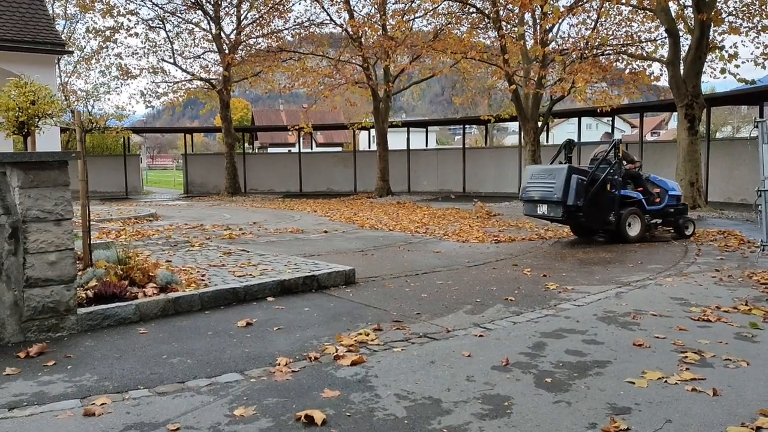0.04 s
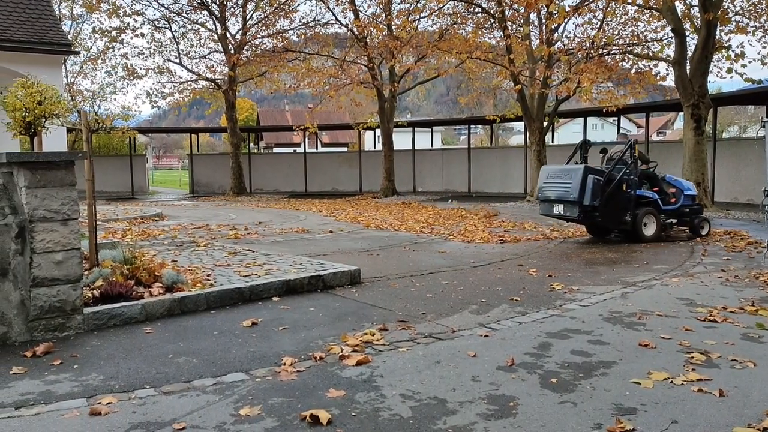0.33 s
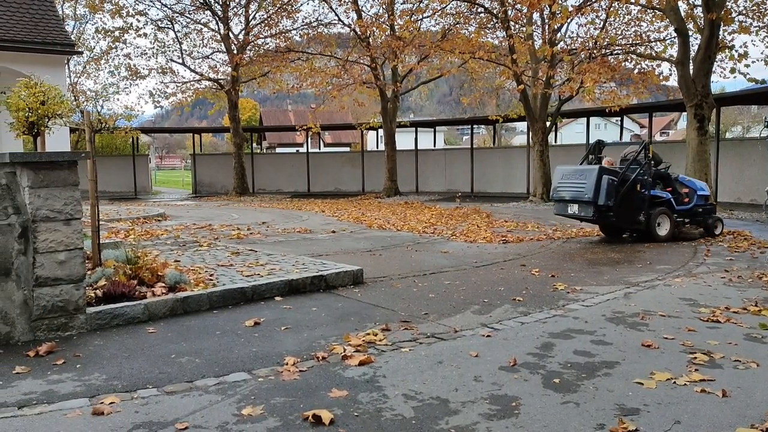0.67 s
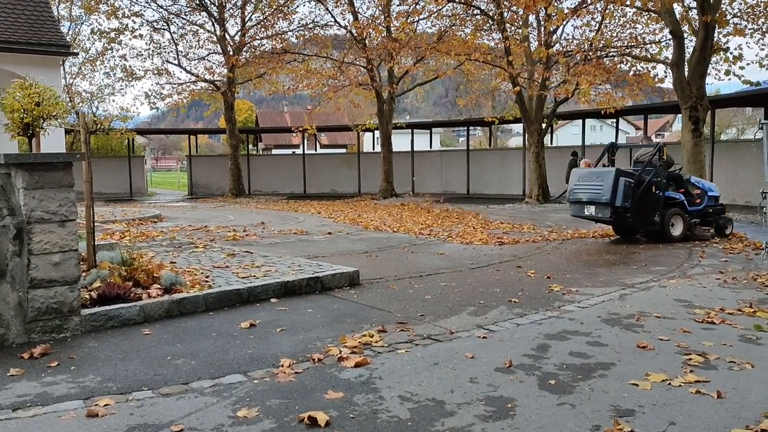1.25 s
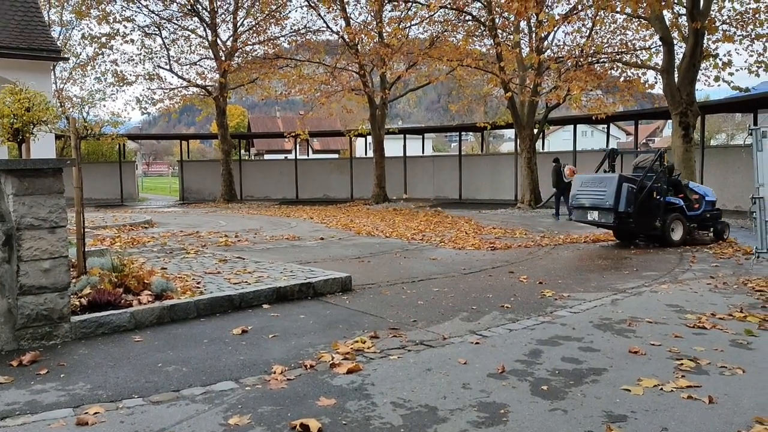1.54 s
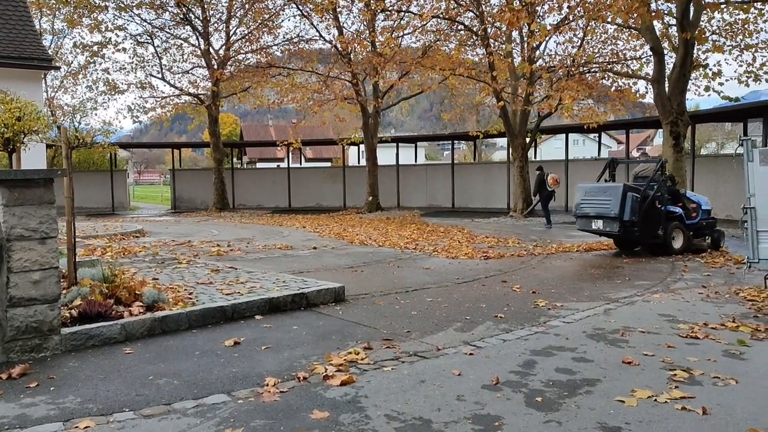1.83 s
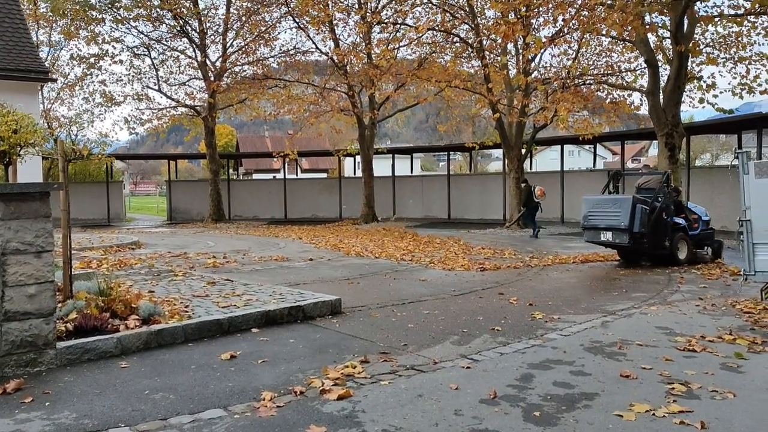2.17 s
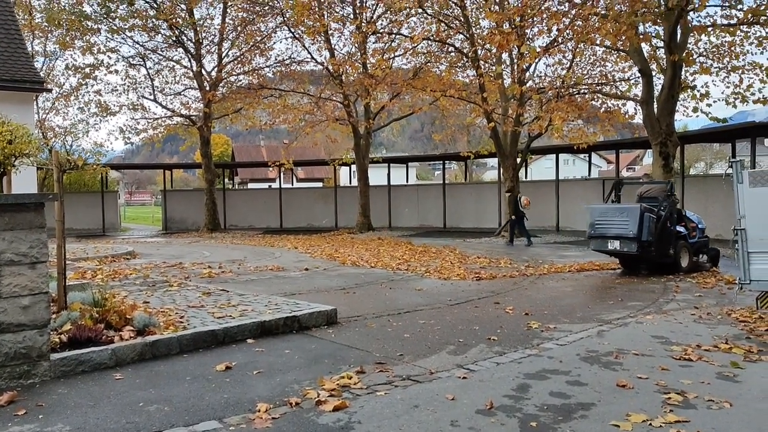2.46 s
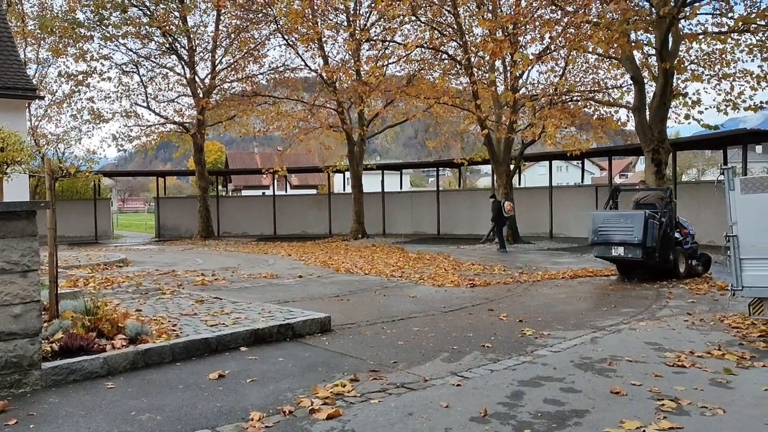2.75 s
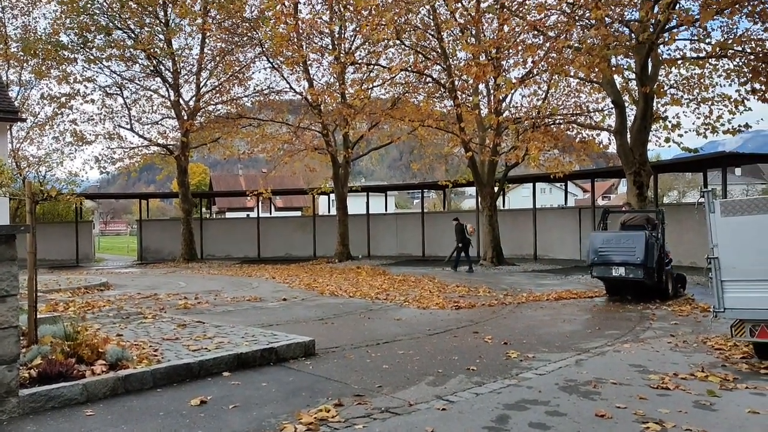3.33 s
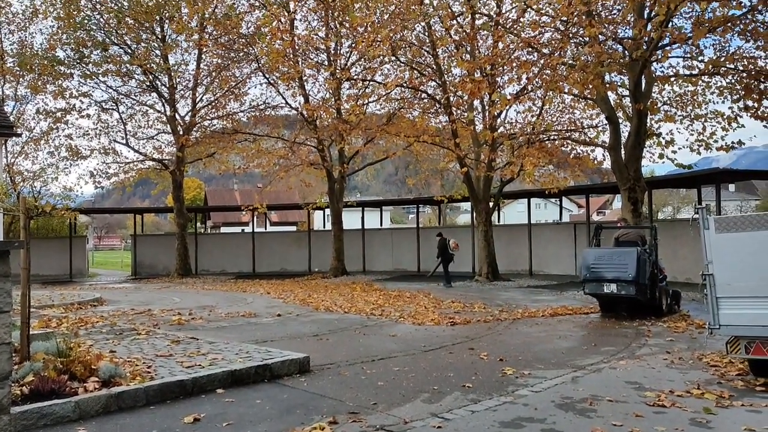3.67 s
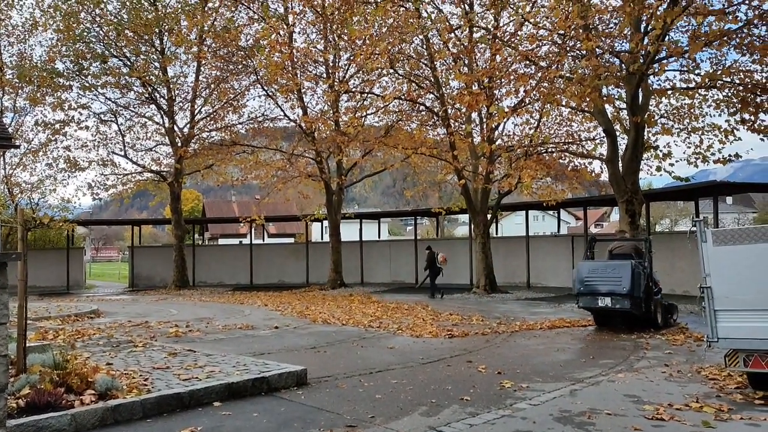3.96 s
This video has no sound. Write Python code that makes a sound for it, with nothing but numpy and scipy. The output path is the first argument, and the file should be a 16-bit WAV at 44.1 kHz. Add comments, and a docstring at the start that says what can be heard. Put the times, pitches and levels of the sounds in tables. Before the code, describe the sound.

A ride-on leaf collector drones across a paved yard, its suction fan roaring as dry leaves hiss and click up the duct. Farther off a leaf blower swells and fades, and a fast ticking enters near the end.

```python
"""A ride-on leaf collector drives across a paved yard, its engine held at steady revs. From the start
the engine drones, the suction fan roars and dry leaves hiss up the duct, while a leaf blower revs up
and down farther off. After about a second the collector begins to turn its back to the listener.
Midway, air whistles in the duct as more clumps of leaves strike it. Near the end a fast ticking,
probably a small idling engine, comes in from the right."""
import sys
import numpy as np
from scipy import signal
from scipy.fft import rfft, irfft, next_fast_len
from scipy.io import wavfile
from scipy.ndimage import map_coordinates

SR = 44100
rng = np.random.default_rng(int(sys.argv[2]) if len(sys.argv) > 2 else 0)


def dump_mix(stems):
    """Bounce the given channels to the path in sys.argv[1] as a 16-bit WAV at rate SR."""
    frames = np.atleast_2d(stems).T  # one column per channel
    limited = np.clip(frames, -1, 1)  # hard clip at full scale
    pcm = np.round(limited * 32767).astype(np.int16)
    wavfile.write(sys.argv[1], SR, pcm)


N = 176400
TIME = np.arange(N) / SR
SIDES = np.array([[.5], [-.5]])  # splits a difference: half added on the left, half taken off the right


def amp(db):
    """Turn decibels into a factor to multiply by."""
    return 10 ** (np.asarray(db) / 20)


def unit(x):
    """Scale a sound to an average strength (rms) of 1."""
    return x / np.sqrt(np.mean(x ** 2) + 1e-20)


def along(points, hz):
    """Read between a table's rows at any frequency, on a log scale."""
    freqs, values = np.transpose(points)
    return np.interp(np.log(hz + 1), np.log(freqs + 1), values)


def curves(rows):
    """Join a table's rows with straight lines: one curve for each column after the time."""
    times, *columns = np.transpose(rows)
    return [np.interp(TIME, times, column) for column in columns]


def wobble(rate):
    """A smooth curve through `rate` random values a second."""
    coarse = np.arange(0, N + 64, 64)
    smooth = map_coordinates(rng.standard_normal(size=1024), [coarse * rate / SR], mode="wrap")
    return np.interp(np.arange(N), coarse, smooth)


def noise():
    """Two unrelated channels of white noise."""
    return rng.standard_normal((2, N))


def filtered(x, response):
    """Multiply each frequency in x by response(hz)."""
    size = next_fast_len(N + SR // 4)
    return irfft(rfft(x, size) * response(np.fft.rfftfreq(size, 1 / SR)), size)[..., :N]


def angle(hz):
    """How far a shaft has turned, in radians, given its turns a second."""
    return 2 * np.pi * np.cumsum(hz) / SR


# How alike the two ears' sounds are. Each row: frequency in Hz, likeness from 0 to 1.
EAR_LIKENESS = [(100, 0.47), (300, 0.94), (420, 0.37), (600, 0.073), (900, 0.1), (2000, 0.12), (7000, 0.19),
                (15000, 0.11)]

def spread(pair, colour, lead_s=.00016):
    """Make two unrelated signals one coloured stereo sound that reaches the left ear lead_s earlier."""
    def shape(hz):
        blend = np.arccos(np.clip(along(EAR_LIKENESS, hz), -1, 1)) / 2
        return amp(along(colour, hz)) * [np.cos(blend), np.sin(blend)]
    mid, side = filtered(pair, shape)
    ears = np.array([mid + side, mid - side])
    return unit(filtered(ears, lambda hz: np.exp(2j * np.pi * hz * lead_s * SIDES)))


def harmonic(shaft, multiple, scatter, rate, apart):
    """One tone at a multiple of a shaft's speed, plus shifting echoes from the yard."""
    def drift():
        return wobble(rate) + 1j * wobble(rate)
    direct = np.exp(1j * apart * SIDES)  # apart: phase between the ears, in radians
    echoes = scatter * (drift() + .5 * np.array([drift(), drift()]))
    phase = multiple * shaft + rng.uniform(0, 2 * np.pi) + 0.71 * wobble(1.61)
    return unit(np.real((direct + echoes) * np.exp(1j * phase)))


# The blower's revs. Each row: time in seconds, turns a second, relative level in dB.
BLOWER_REVS = [(0, 139.5, -31.5), (.7, 137.6, -26), (.92, 139, -31), (1.05, 141.2, -24.5), (1.3, 138, -43),
               (1.7, 130.3, -55), (2, 139, -29), (2.25, 145.5, -35), (2.5, 138, -53), (3.4, 137.4, -35),
               (3.7, 153, -34), (4, 155, -31)]
# Its tones. Each row: multiple of the shaft speed, dB added to that level.
BLOWER_TONES = [(4, -1.5), (5, -13)]

def blower():
    """The distant leaf blower's note follows its throttle."""
    hz, db = curves(BLOWER_REVS)
    shaft = angle(hz * (1 + 0.0019 * wobble(12)))
    return amp(db) * sum(amp(level) * harmonic(shaft, round(k), scatter=0.8, rate=14, apart=.5 * k)
                         for k, level in BLOWER_TONES)


# The ticking's pace. Each row: time in seconds, ticks a second, relative level in dB.
TICK_PACE = [(3.1, 45, -54), (3.35, 56, -39), (3.5, 51, -41), (3.62, 50, -34.5), (3.78, 51.5, -34.5),
             (4, 49, -36.5)]
# Its bright colour. Each row: frequency in Hz, relative level in dB.
TICK_COLOUR = [(1500, -60), (3000, -16), (5200, -19), (6800, 5.5), (8300, 6), (9500, 1.5), (12500, -7),
               (15400, -1)]

def ticking():
    """One bright puff per turn, probably of a small engine, quickening a little on the right."""
    rate, db = curves(TICK_PACE)
    age_s = (np.cumsum(rate) / SR % 1) / rate
    puffs = np.exp(-age_s / 0.0083) * amp(1.4 * wobble(65))
    ticks = spread(puffs * noise(), TICK_COLOUR, lead_s=-0.000533)
    return amp(db - 4 * SIDES) * ticks


# Hits on the duct. Each row: start in seconds, relative level in dB, fading time in seconds.
CLUMP_HITS = [(.535, -21.5, 0.015), (.556, -30, 0.03), (1.055, -29, .016), (1.632, -23, 0.0082),
              (1.789, -22, .007), (2.081, -23, .006), (2.142, -20, .006), (3.094, -29.5, .018),
              (3.204, -23, 0.0055)]
# Their colour. Each row: frequency in Hz, relative level in dB.
CLUMP_COLOUR = [(1000, -40), (3500, -1), (7100, 4), (9500, 3), (15400, -9)]

def clumps():
    """Thick clumps of leaves hit the duct with a short bright scrape, twigs with a tick."""
    level = np.zeros(N)
    for start, db, fade_s in CLUMP_HITS:
        age_s = np.maximum(TIME - start, 0)
        rise = 1 - np.exp(-age_s / 0.00099)
        level += amp(db) * rise * np.exp(-age_s / fade_s)
    return level * spread(noise(), CLUMP_COLOUR)


def crackle(per_second=340, fade_s=0.0019):
    """Leaves crackle in brief random bursts, a few much larger than the rest."""
    hits = rng.random(N) < per_second / SR
    sizes = amp(2.6 * np.minimum(rng.exponential(size=N), 4))
    bursts = signal.lfilter([1], [1, -np.exp(-1 / (fade_s * SR))], hits * sizes)
    return unit(bursts * noise())


# The flow of leaves up the duct. Each row: time in seconds, relative level in dB.
LEAF_FLOW = [(0, -34.5), (.5, -33.5), (.64, -32), (.82, -34.5), (1.1, -30), (1.56, -34.5), (1.64, -32),
             (1.8, -31), (2.03, -31.5), (2.2, -30.5), (2.44, -35.5), (2.78, -33.5), (2.93, -40),
             (3.05, -32.5), (3.42, -38), (4, -38)]
# The colour of the duct's hiss. Each row: frequency in Hz, relative level in dB.
HISS_COLOUR = [(800, -36), (2000, -5.5), (3800, 1), (5200, -6), (6100, -0.5), (7100, 3.5), (8400, -1),
               (10000, -4.5), (13000, -11), (15400, -10)]

def leaves(split_hz=8000):
    """Dry leaves hiss up the duct; large ones crackle low, small ones high."""
    def low_share(hz):
        return 1 / (1 + (hz / split_hz) ** 6)
    large = filtered(crackle(), lambda hz: np.sqrt(low_share(hz)))
    small = filtered(crackle(), lambda hz: np.sqrt(1 - low_share(hz)))
    rustle = spread(noise() + amp(-8) * (large + small), HISS_COLOUR)
    flicker_db = 0.4 * wobble(25.05) + 1.02 * wobble(140)
    return amp(curves(LEAF_FLOW)[0] + 3.5 + flicker_db) * rustle


# The whistle swells and fades. Each row: time in seconds, relative level in dB.
WHISTLE_SWELL = [(1.5, -56), (1.8, -48), (2.15, -36.5), (2.55, -42), (2.8, -53)]

def whistle(pitch_hz=7360, half_width_hz=140):
    """Rushing air makes the duct ring at one high pitch."""
    ring = filtered(noise(), lambda hz: 1 / (1 + ((hz - pitch_hz) / half_width_hz) ** 2))
    return amp(curves(WHISTLE_SWELL)[0]) * spread(ring, HISS_COLOUR)


# The fan's hum, which beats with the engine. Each row: multiple of the fan speed, relative level in dB.
FAN_TONES = [(6, -32), (7, -40.5), (8, -34.5)]
# How loud the low roar and the higher rasp are. Each row: time in seconds, relative level in dB.
ROAR_LEVEL = [(0, -23), (.5, -21.5), (1.05, -20.5), (1.4, -25), (2.15, -22), (2.5, -25.5), (2.64, -20.5),
              (2.75, -25), (3, -24.5), (3.25, -23.5), (4, -24)]
RASP_LEVEL = [(0, -30.5), (1.15, -29), (1.59, -30), (2.18, -27), (2.41, -30.5), (4, -29)]
# Their colours, the rasp's from two sides. Each row: frequency in Hz, relative level in dB.
ROAR_COLOUR = [(30, -49), (130, -52.5), (200, -39.5), (235, -24.5), (285, -4), (340, 0.5), (430, -2.5),
               (560, 1), (720, -0.5), (850, -8), (1200, -15), (2500, -80)]
RASP_FROM_SIDE = [(400, -52), (700, -1), (950, -1.5), (1200, 2), (1400, 3.5), (1600, -5.5), (2100, 2.5),
                  (2450, -3.5), (2800, -4), (3400, -13), (5000, -19.5), (16000, -23)]
RASP_FROM_BEHIND = [(400, -56), (700, 5.5), (920, 1), (1150, 0), (1350, -4.5), (1600, -2), (1920, 0.5),
                    (2450, -2.5), (2750, -5), (3400, -14.5), (5000, -38), (16000, -28)]

def fan(shaft, behind, speed_hz=57.1):
    """The suction fan hums, its roar throbs with the engine, and its rasp changes as the machine turns."""
    rotor = angle(speed_hz * (1 + 0.0026 * wobble(2.95)))
    hum = sum(amp(db - 10 * behind) * harmonic(rotor, round(k), scatter=0.5, rate=8.43, apart=0.38)
              for k, db in FAN_TONES)
    throb = amp(0.87 * np.cos(shaft))
    roar = amp(curves(ROAR_LEVEL)[0] - 2) * spread(throb * noise(), ROAR_COLOUR)
    side_rasp = np.sqrt(1 - behind) * spread(noise(), RASP_FROM_SIDE)
    back_rasp = np.sqrt(behind) * spread(noise(), RASP_FROM_BEHIND)
    rasp_db = curves(RASP_LEVEL)[0] + 2.03 + 0.87 * wobble(40.16)
    return hum + roar + amp(rasp_db) * (side_rasp + back_rasp)


# The two strongest engine tones. Each row: time in seconds, lower tone's level in dB, upper tone's in dB.
BOOM_LEVELS = [(0, -29, -39), (.4, -43, -39), (.72, -43, -40), (1.0, -31.5, -28), (1.35, -42, -27.5),
               (1.68, -51, -25.5), (1.85, -26.5, -27), (2.02, -32.5, -25), (2.2, -28, -26), (2.5, -46, -32),
               (2.75, -32.5, -30.5), (3.45, -31.5, -29.5), (4, -40.5, -31)]
BOOM_MULTIPLES = (6, 9)
# The drone. Each row: multiple of the shaft speed, then levels in dB when setting off, side-on,
# turning away and seen from behind.
DRONE_TONES = [(5, -41.5, -37, -42, -56), (7, -35, -35, -48.5, -37), (8, -38, -53, -40, -33),
               (10, -33.5, -50, -35, -41), (11, -32.5, -37.5, -52, -36.5), (12, -38, -37, -38, -34.5),
               (13, -48, -49, -40.5, -39), (14, -44, -43, -39.5, -47.5)]
HEADING_S = (.35, .75, 2.1, 3.2)  # when the machine faces each of those four ways
# The high whine. Each row: multiple (rounded when played), level in dB from the side, then from behind.
WHINE_TONES = [(15, -43.5, -47), (16, -44.5, -50), (18, -51, -46.5), (28, -50.5, -53.5), (32, -59, -43.5),
               (33.2, -54, -53.5), (34.5, -50, -56)]

def engine(shaft, behind):
    """Exhaust tones change balance as the machine turns; the weaker ones waver more in the yard's echoes."""
    boom = sum(amp(db) * harmonic(shaft, k, scatter=.17, rate=8.31, apart=0.11 * k)
               for k, db in zip(BOOM_MULTIPLES, curves(BOOM_LEVELS)))
    drone = [(k, np.interp(TIME, HEADING_S, levels)) for k, *levels in DRONE_TONES]
    whine = [(k, side + (back - side) * behind) for k, side, back in WHINE_TONES]
    return boom + sum(amp(db) * harmonic(shaft, round(k), scatter=.45, rate=7, apart=0.057 * k)
                      for k, db in drone + whine)


# The engine's nearly steady speed. Each row: time in seconds, turns a second.
ENGINE_SPEED = [(0, 58.45), (.45, 58.83), (1.1, 58.77), (1.5, 58.51), (2, 58.85), (2.6, 58.54),
                (3.5, 59.02), (4, 58.5)]
# The collector drifts to the right. Each row: time in seconds, left minus right in dB.
COLLECTOR_PAN = [(.8, 0), (3.2, -0.6), (4, -1.5)]

def scene():
    """The leaf collector turns away, with the blower and the ticking around it."""
    shaft = angle(curves(ENGINE_SPEED)[0] * (1 + 0.0013 * wobble(10)))
    behind = np.interp(TIME, (0.94, 3.08), [0, 1])  # 0 is side-on, 1 is with its back to us
    collector = engine(shaft, behind) + fan(shaft, behind) + leaves() + clumps() + whistle()
    return collector * amp(curves(COLLECTOR_PAN)[0] * SIDES) + blower() + ticking()


# The colour of the two microphone openings. Each row: frequency in Hz, left minus right in dB.
MIC_COLOUR = [(300, 2), (700, 0), (1100, 4.5), (1550, -1), (2050, 4.5), (2500, 1), (3200, 2.5), (4500, 5.5),
              (5900, 7.5), (6700, 8), (7400, -5.5), (8300, -2), (10000, 2.5), (12500, 4.5), (15000, 8)]
TOP_HZ = 15750

def record(dry):
    """Each microphone opening adds its colour; everything above TOP_HZ is cut."""
    return filtered(dry, lambda hz: amp(along(MIC_COLOUR, hz) * SIDES) * (hz < TOP_HZ))


dry = scene()
out = record(dry)
dump_mix(out)
```